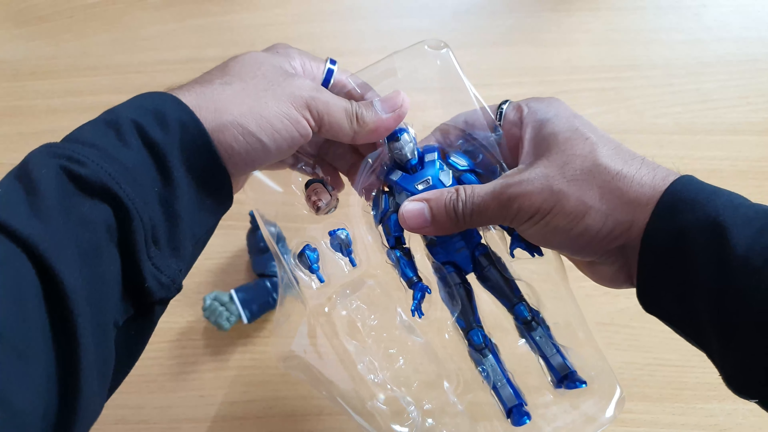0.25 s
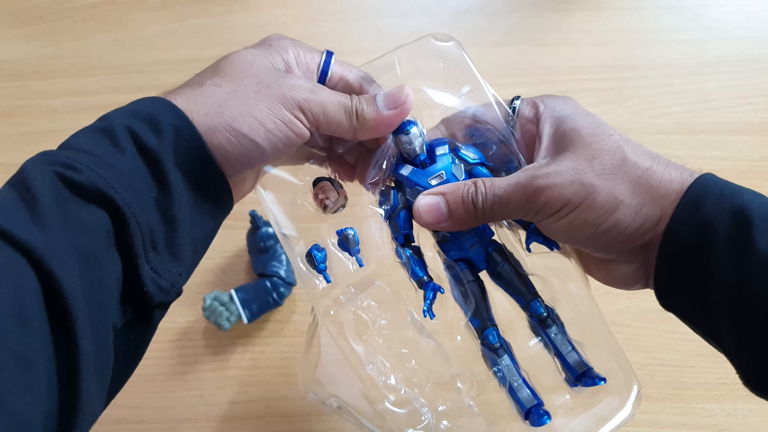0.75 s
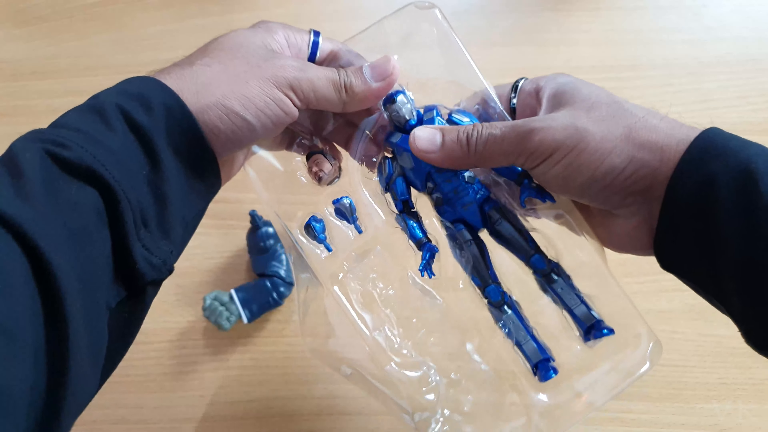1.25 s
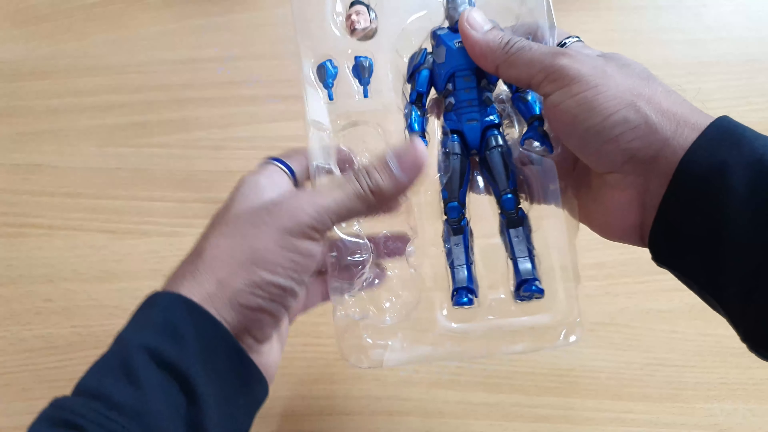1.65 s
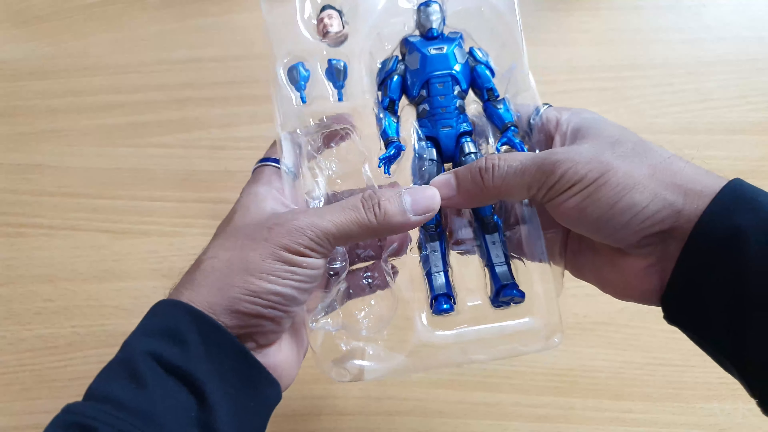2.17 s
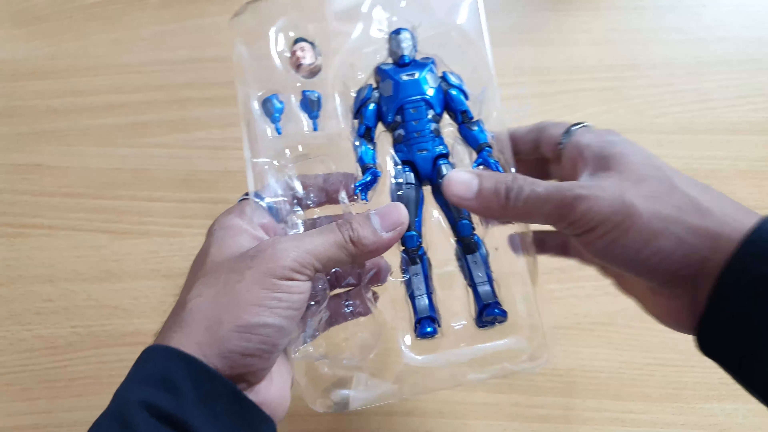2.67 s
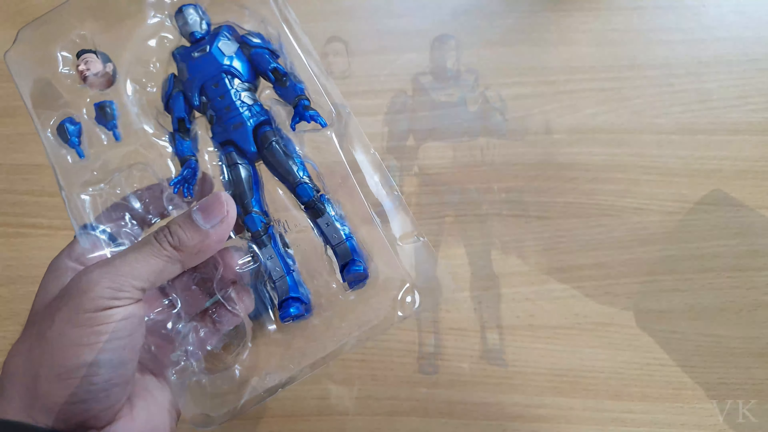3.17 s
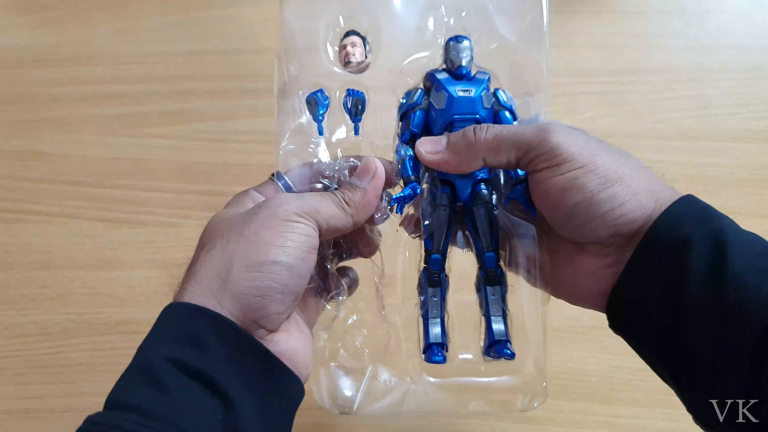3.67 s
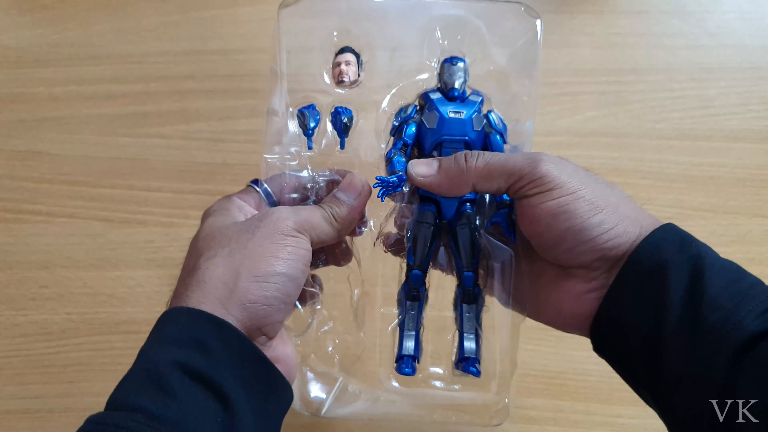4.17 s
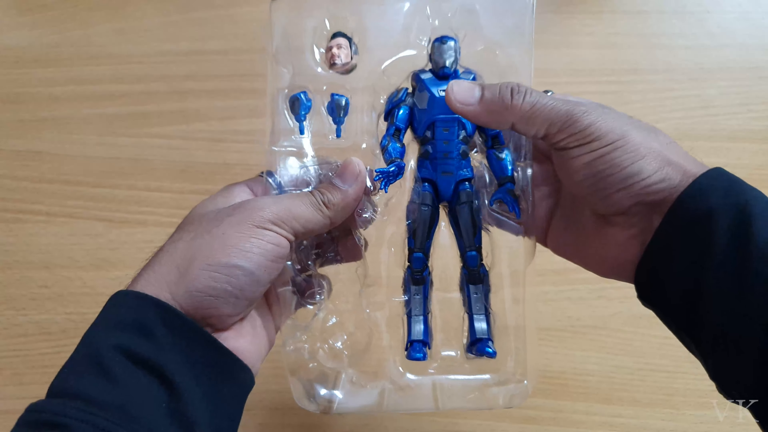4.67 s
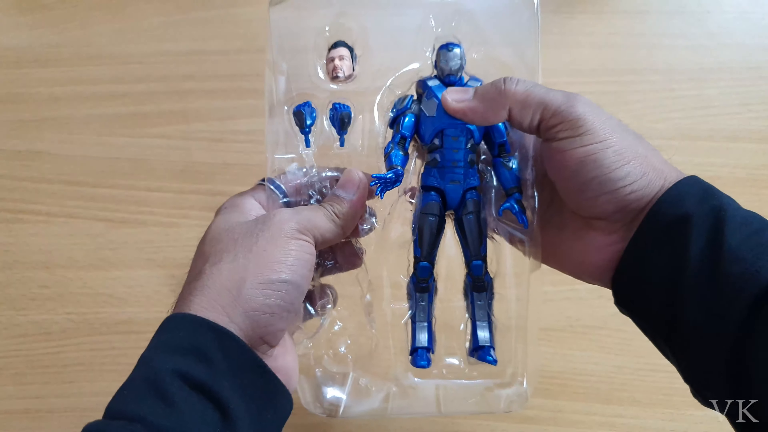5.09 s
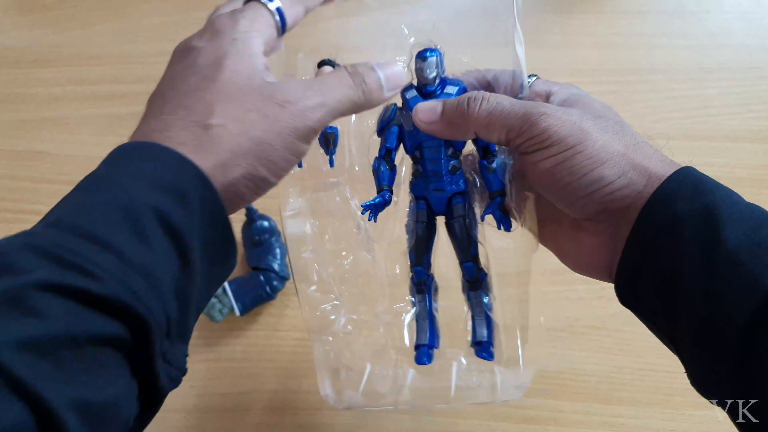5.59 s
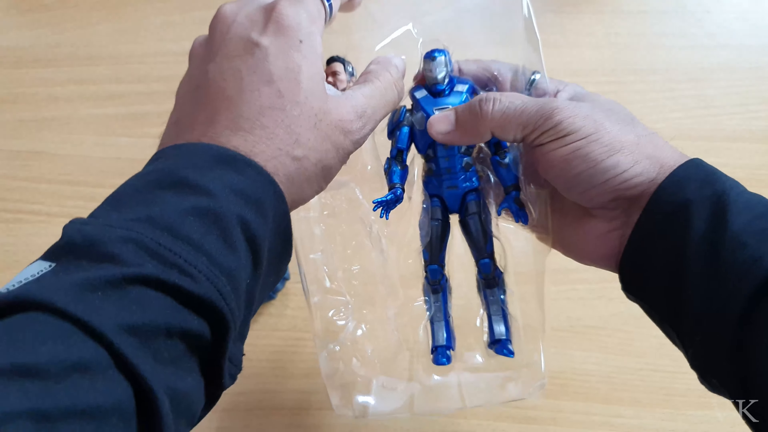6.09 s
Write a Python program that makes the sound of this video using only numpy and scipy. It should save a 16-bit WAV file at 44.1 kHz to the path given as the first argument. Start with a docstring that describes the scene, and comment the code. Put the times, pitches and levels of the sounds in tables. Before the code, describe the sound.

Thin rigid plastic crackles and crunches right up close as a toy is worked in its packaging. Irregular hollow knocks and bright sharp ticks come in bursts, softer and sparser at first, thickening around two seconds, nearly stopping, then returning loud and brittle with overloaded cracks and a grating creak. A short pause precedes the last busy snaps. Short room echoes and a steady dull room tone sit behind.

```python
"""Hands press and twist a stiff moulded plastic tray to free a toy, close to a stereo microphone in a small room.
A snap is already ringing at the start; dents then flip one after another under a crackling grip, with a brief
squeak as the toy slips. After a near lull the grip returns with denser, harder snaps, the loudest overloading,
and a second, slower creak; another pause, then a last flurry. Each dent has a main ring over bursts from walls,
ribs and creases; small creases crackle between; short diffuse echoes and steady dull room tone lie behind."""
import sys
import numpy as np
from scipy import signal
from scipy.fft import rfft, irfft, next_fast_len
from scipy.io import wavfile
from scipy.ndimage import uniform_filter1d

SR = 44100
rng = np.random.default_rng(int(sys.argv[2]) if len(sys.argv) > 2 else 0)


def to_wav(sig):
    """Store sig (one row per channel, or 1-D mono) as 16-bit WAV at the path in sys.argv[1].

    Samples outside -1..1 are clipped; the rate is SR.
    """
    pcm = np.clip(np.atleast_2d(sig), -1, 1) * 32767
    pcm = np.round(pcm).astype(np.int16)
    wavfile.write(sys.argv[1], SR, pcm.T)  # frames by channels


def how_loud(loudness_db):
    """Turn decibels into a plain amplitude multiplier (0 dB gives 1, 20 dB gives 10)."""
    steps = np.asarray(loudness_db, float) / 20
    return 10 ** steps


N = 279339
RUN_IN = 2048   # samples sounded before the start
LEAD_S = 0.00007   # the left hears the tray first

# where the tray's crowded modes bunch, in rows for panels, walls, ribs and creases:
# nominal centre_hz, nominal width_hz of one resonator pass
TRAY_MODES = [(520, 470), (1330, 694), (2650, 2130), (5600, 9700)]


def at_hz(points, hz, column=1):
    """Read a table on a log-frequency axis."""
    points = np.array(points)
    return np.interp(np.log(hz + 1), np.log(points[:, 0]), points[:, column])


def peak_one(x):
    """Scale each row to height 1."""
    return x / np.abs(x).max(axis=-1, keepdims=True)


def rms_one(x):
    """Scale to rms 1."""
    return x / np.sqrt(np.mean(x ** 2) + 1e-20)


def resonance(hz, centre_hz, width_hz):
    """Response of a damped resonator applied three times."""
    damping = 1j * hz * width_hz
    return (damping / (centre_hz ** 2 - hz ** 2 + damping)) ** 3


def swell(t, rise_s, t60):
    """The dent takes a moment to flip, then the sound dies."""
    rise = np.sin(np.pi / 2 * np.minimum(t / rise_s, 1)) ** 2
    return rise * how_loud(-60 * t / t60)


def dents():
    """Snaps and ticks as one list; a tick's main ring is faint and sits at the walls' pitch."""
    # dents snapping through: start_s, ribs_db, pitch_hz of the snap's main ring, main_db as its level, crack_db
    snap_list = [(-0.012, 8.5, 1850, -14.5, 5), (0.058, -3, 577, -15.5, -47),
                 (0.0685, -1.5, 928, -2.5, -29), (0.0793, 0, 351, -14.5, -42),
                 (0.2582, -49, 593, -12.5, -43), (0.332, -3, 858, -9.5, -35.5),
                 (0.382, 2, 2710, -18.5, -35.5), (0.4488, 4.5, 721, -4, 3.5), (0.4753, 8.5, 657, 3.5, 3),
                 (0.6751, 2, 2890, -13.5, -6.5), (0.7357, -6.5, 775, -9.5, -65),
                 (0.775, -17, 361, -10.5, -59), (0.8141, 1, 2640, 2, -3), (0.9058, -21.5, 668, -7.5, -59),
                 (0.9663, -48, 336, -22, -11), (1.0703, -9, 2506, -17.5, -46),
                 (1.145, -12.5, 1400, -15, -49), (1.161, -2.5, 1910, -8, -44),
                 (1.169, -18.5, 650, -6, -39.5), (1.317, -38.5, 446, -22, -54),
                 (1.3271, -18, 560, -11.5, -48), (1.355, 8.5, 560, -2.5, 7),
                 (1.4598, -16.5, 624, -14.5, -56), (1.596, -24, 585, -22, -69.5),
                 (1.639, -25, 512, -6, -41), (1.671, -14.5, 509, -11, -54), (1.7966, -7.5, 559, -12, -27.5),
                 (1.8142, -0.5, 612, -9.5, -37), (1.8584, 1, 1460, -6, -23.5),
                 (1.8776, 4, 1415, -4.5, -32.5), (1.9473, -5, 1394, -11.5, -49.5),
                 (1.9655, -19.5, 1340, -8.5, -46), (2.0024, 0, 1410, -7.5, -9.5),
                 (2.0375, -6, 742, -10.5, -40.5), (2.0768, -3.5, 562, -8, -49.5),
                 (2.1088, 6.5, 2280, -2, -44.5), (2.1444, 4, 611, -17.5, -10.5), (2.155, -2, 1480, -4, -24),
                 (2.2014, -7.5, 2830, -2, -1), (2.3211, -7, 1248, -11, -43), (2.4079, -4, 1064, -21, -30.5),
                 (2.5266, -6, 1640, -17.5, -32.5), (2.6191, 6, 559, -8.5, 0),
                 (3.3825, -37.5, 2900, -9, -11), (3.4808, -11, 689, 0.5, -1),
                 (3.5063, 12, 3130, -14.5, -2.5), (3.5178, -18.5, 567, -14, 4.5),
                 (3.5581, -8, 670, -3, -35.5), (3.597, 11, 757, 4.5, -0.5), (3.745, 2.5, 751, -16, -10),
                 (3.757, -2, 3200, -10.5, 1), (3.8462, -4, 1696, -19.5, -6),
                 (3.9258, 2.5, 1420, -14, -43.5), (3.9673, 5.5, 684, -6.5, 7.5),
                 (3.9949, -1, 3030, 7.5, -12.5), (4.012, 9, 670, -10, 18.5), (4.0322, 9, 2730, 6, 13.5),
                 (4.0634, 9, 690, -0.5, -33), (4.1377, -4, 2086, -7, -18), (4.237, -5.5, 2670, -8.5, -4),
                 (4.2666, 1.5, 746, -12, -5), (4.285, 7, 1310, -9, -12), (4.298, 0.5, 774, -21, -1.5),
                 (4.3562, 9, 620, -2, 6), (4.5862, 2.5, 1933, -9, -4), (4.623, -5.5, 2390, -6.5, -6),
                 (4.7003, -0.5, 1390, -4, -16.5), (4.9291, 13.5, 704, 3, 4), (4.984, 2, 452, -14, -42),
                 (5.0377, -4, 780, -15, -1.5), (5.121, -7, 2320, -2.5, -53), (5.1283, 5.5, 1400, 2, -33.5),
                 (5.19, -2.5, 2830, -3.5, -2.5), (5.222, 10, 803, -3, 0.5), (5.2405, -6.5, 577, 0.5, 2),
                 (5.36, -4, 700, -16.5, -41.5), (5.368, -11.5, 290, -17.5, -53),
                 (5.385, -9.5, 626, -17.5, -47), (5.6336, -9.5, 558, -31.5, -64),
                 (5.6514, -20, 586, -24, -50), (5.8205, -24.5, 1490, -16.5, -42),
                 (5.8614, 13, 1555, -6, -33), (5.8777, 3, 737, -7, -45.5), (5.9237, -16, 546, -12.5, -27.5),
                 (5.9501, 11.5, 1207, -10.5, -31.5), (5.9836, -15.5, 776, -15.5, -40),
                 (6.005, 6.5, 805, -1.5, -35), (6.082, 2, 463, -4.5, -41), (6.1126, 1.5, 2865, -3.5, -49.5),
                 (6.1317, -19.5, 2570, -7, -50), (6.144, -20.5, 2750, -6.5, -33.5),
                 (6.1639, 3, 750, -13.5, -35.5), (6.2043, -22.5, 2520, -2.5, -20.5),
                 (6.2105, -2, 790, -13.5, -43.5), (6.2645, 1.5, 3080, -12.5, -4.5),
                 (6.269, -30, 347, -23, -60.5), (6.294, -8.5, 834, -15, -34), (6.3145, -4, 733, -15.5, -48)]
    # single creases ticking: start_s, ribs_db, crack_db
    tick_list = [(0.137, -4, -32), (0.1629, -11.5, -6.5), (0.2104, 3.5, 2), (0.23, 4.5, -21),
                 (0.3206, 1, 12.5), (0.5966, 9.5, -21.5), (1.787, -10, -31.5), (2.5363, -10, -9.5),
                 (2.924, -34.5, -38), (3.3714, -5.5, -8.5), (3.4639, 4, -3.5), (3.787, -12.5, -16),
                 (3.7929, -1.5, 5.5), (3.88, -3, -9), (3.9772, 5.5, -33), (4.1691, -2, -0.5),
                 (4.215, -5.5, -14), (4.291, -8, -29), (4.316, -4.5, -8.5), (4.5036, 0, -9),
                 (4.834, -19, -7.5), (5.1723, 3, -41.5), (5.256, 7, -23.5), (5.599, -18, -41.5)]
    tick_main_db = -27.5   # against the tick's ribs
    return snap_list + [(s, ribs_db, TRAY_MODES[1][0], ribs_db + tick_main_db, crack_db)
                        for s, ribs_db, crack_db in tick_list]


def snaps():
    """Each flip shakes the tray for a few ms; returns what the two microphones hear and what goes into the room."""
    start_s, ribs_db, pitch_hz, main_db, crack_db = np.transpose(dents())
    # the walls' level lies between the main ring's and the ribs'; high rings count for less
    main_share, wall_gain_db = 0.48, -2.5
    octaves_high = np.maximum(np.log2(pitch_hz / 1400), 0)
    walls_db = main_share * (main_db - 9 * octaves_high) + (1 - main_share) * ribs_db + wall_gain_db
    pitch, main_level, ribs_level = pitch_hz[:, None], main_db[:, None], ribs_db[:, None]
    count = len(start_s)
    t = np.arange(4096) / SR
    hz = np.arange(len(t) // 2 + 1) * SR / len(t)
    chance = rng.standard_normal((count, 8, 1))

    # the main ring beats with a weaker, usually lower neighbour
    turns = pitch * t
    neighbour_turns = turns * (0.8 + 0.07 * chance[:, 0]) + chance[:, 1]
    tone = np.sin(2 * np.pi * turns) + 0.31 * np.sin(2 * np.pi * neighbour_turns)
    slow = (600 / pitch) ** 0.61   # high rings rise and die faster
    # a dent that spares the ribs rolls over gently
    soft = np.clip(how_loud(0.4 * (main_level - ribs_level)), 0.7, 3.0)
    ring = how_loud(main_level) * peak_one(tone * swell(t, rise_s=0.0023 * slow * soft, t60=0.046 * slow))

    # the whole tray booms most under main rings near 1 kHz, 30 dB less per octave away
    body_hz = 455.4 * (1 + 0.12 * np.tanh(chance[:, 6]))
    body = np.sin(2 * np.pi * body_hz * t) * peak_one(swell(t, rise_s=0.0054, t60=0.022))
    ring = ring + body * how_loud(main_level - 30 * np.abs(np.log2(pitch / 1000)))

    # the ring's front and back partly cancel at a distance: the room gets mostly its first, broad push
    left, right, radiated = ring, ring, ring * how_loud(1.5 - 60 * t / 0.037)

    # walls, ribs and creases: nominal flip time (s), left-right unlikeness, spread of tuning
    parts = [(0.0045, 0.31, 0.074), (0.0045, 0.2, 0.21), (0.0048, 1, 0.047)]
    for k, part_db in enumerate([walls_db, ribs_db, crack_db], start=1):
        flip_s, unlike, spread = parts[k - 1]
        centre_hz, width_hz = TRAY_MODES[k]
        shape = resonance(hz, centre_hz * (1 + spread * chance[:, k + 1]), width_hz)
        push = np.sin(np.pi * np.minimum(t / (flip_s * soft[:, None]), 1)) ** 2
        jolts = rng.standard_normal((count, 2, len(t))) * push
        pair = irfft(rfft(jolts[:, :1] + unlike * jolts) * shape[:, None], len(t))
        pair = how_loud(part_db[:, None, None]) * peak_one(pair)
        left, right = left + pair[:, 0], right + pair[:, 1]
        # summed over all directions the burst has a smooth spectrum and the same energy
        smooth = irfft(shape, len(t))
        strength = np.linalg.norm(pair[:, 0], axis=1) / np.linalg.norm(smooth, axis=1)
        radiated = radiated + smooth * strength[:, None]

    # each snap comes from its own spot on the tray, so its lead on the left differs
    lead_s = LEAD_S + 0.00005 * chance[:, 5]
    right = irfft(rfft(right) * np.exp(-2j * np.pi * hz * lead_s), len(t))
    out = np.zeros((3, RUN_IN + N + len(t)))
    starts = RUN_IN + np.round(start_s * SR).astype(int)
    for start, heard in zip(starts, np.stack([left, right, radiated], axis=1)):
        out[:, start:start + len(t)] += heard
    return out[:2, RUN_IN:RUN_IN + N], out[2, :RUN_IN + N]


def pressure_db():
    """Each grip closes fast, surges, settles to its hold and lets go; strain gathers round each snap; the firmest rules."""
    # the fingers grip the creases: start_s, length_s, hold_db of the crackle, surge_db above it at first contact
    grip_list = [(-.05, 1.2, -33, 17.5), (1.776, 0.44, -33, 10), (3.403, 0.9, -30.5, 2),
                 (4.301, 0.486, -41, 33), (4.887, 0.53, -31, 11), (5.799, .6, -37, 3.5)]
    t = np.arange(0, N / SR, 0.001)
    # creases strain just before a dent gives and settle after it (dB per s)
    strain = np.max([ribs_db - 21 - 2500 * np.maximum(s - t, 0) - 303 * np.maximum(t - s, 0)
                     for s, ribs_db, *_ in dents()], axis=0)
    grips = []
    for s, length_s, hold_db, surge_db in grip_list:
        surge = surge_db * np.exp(-np.maximum(t - s, 0) / 0.06)
        closing = 1500 * np.maximum(s - t, 0)   # dB per s
        release = 400 * np.maximum(t - s - length_s, 0)   # dB per s
        grips.append(hold_db + surge - closing - release)
    return np.interp(np.arange(N) / SR, t, np.maximum(np.max(grips, axis=0), strain))


def crackle(per_s, uneven_db, clump_db):
    """Small creases give way in clumps; each shakes the four parts of the tray by its own amounts."""
    clumps = how_loud(clump_db * rms_one(uniform_filter1d(rng.standard_normal(N), size=400)))
    born = rng.random(N) < per_s * clumps / clumps.mean() / SR
    sizes = how_loud(uneven_db * np.minimum(rng.exponential(1, N), 4)) * born
    # steady pressure frees steady energy
    sizes = sizes / np.sqrt(uniform_filter1d(sizes ** 2, size=6000) + 0.026)
    size = next_fast_len(N)
    hz = np.arange(size // 2 + 1) * SR / size
    spectrum = 0
    for (centre_hz, width_hz), part_db in zip(TRAY_MODES, [6.5, 5.0, 3.0, -3.0]):
        for bend in (0.88, 1, 1.22):   # each crease favours a patch that is tuned lower or higher
            share = rng.standard_normal(N) ** 2 * rng.choice([-1, 1], N)
            shape = resonance(hz, bend * centre_hz, 0.76 * width_hz)
            spectrum = spectrum + how_loud(part_db) * rfft(sizes * share, size) * shape
    left = rms_one(irfft(spectrum, size)[:N]) * how_loud(pressure_db())
    right = np.interp(np.arange(N) - LEAD_S * SR, np.arange(N), left)
    return np.array([left, right])


def creak():
    """Stick-slip: nearly even ticks swell and fade, ringing the walls and ribs; fast slips squeak."""
    # the toy slips against a wall: start_s, length_s, first_slips_per_s, last_slips_per_s,
    # peak_db, ribs_db against the walls
    slip_list = [(1.191, 0.14, 1500, 1840, -32.5, -43), (4.848, 0.1, 143.7, 119.7, -9, -5.5)]
    size = 8192
    hz = np.arange(size // 2 + 1) * SR / size
    out = np.zeros(N)
    for s, length_s, first_hz, last_hz, peak_db, ribs_db in slip_list:
        t = np.minimum(np.arange(size) / SR, length_s)
        stumble = 0.08 * np.cumsum(rng.standard_normal(size)) * np.sqrt(first_hz / SR)
        glide = first_hz * t + (last_hz - first_hz) * t ** 2 / (2 * length_s)
        slips = np.maximum.accumulate(np.floor(glide + stumble))
        uneven = how_loud(3 * rng.standard_normal(size))
        ticks = np.diff(slips, prepend=0) * uneven * np.sin(np.pi * t / length_s)
        shape = resonance(hz, *TRAY_MODES[1]) + how_loud(ribs_db) * resonance(hz, *TRAY_MODES[2])
        rung = irfft(rfft(ticks) * shape, size)
        start = round(s * SR)
        out[start:start + size] = how_loud(peak_db) * peak_one(rung)
    return out


def diffuse(size):
    """Spectra of a left and a right noise, alike in the bass only."""
    # diffuse sound at the two microphones: frequency_hz, left-right likeness (0 to 1)
    likeness = [(300, 0.91), (700, 0.66), (1500, 0.066)]
    hz = np.arange(size // 2 + 1) * SR / size
    mid, side = rfft(rng.standard_normal((2, size)))
    alike = np.clip(at_hz(likeness, hz), 0, 1)
    pair = np.sqrt(1 + alike) * mid + np.sqrt(1 - alike) * side * [[1], [-1]]
    return hz, pair / np.sqrt(2)


def room(x, gap_s):
    """Diffuse echoes dying band by band, fading in over a short gap."""
    # how the small room answers: frequency_hz, t60_s, level_db
    decay = [(294, 0.23, -0.5), (1400, 0.15, 1.5), (5160, 0.32, -8), (13000, 0.1, -10.5)]
    t = np.arange(16384) / SR
    hz, noise = diffuse(len(t))
    tail = 0
    for centre_hz in 125 * 2 ** np.arange(8):
        band = np.clip(1 - np.abs(np.log2((hz + 1) / centre_hz)), 0, 1)
        t60 = at_hz(decay, centre_hz)
        fade = how_loud(at_hz(decay, centre_hz, column=2) - 60 * t / t60)
        fade = fade / np.sqrt(t60 * SR / np.log(1e6))   # evens out the energy of long and short decays
        tail = tail + irfft(noise * band, len(t)) * fade
    tail = tail * np.clip(t / gap_s, 0, 1) ** 2
    return signal.fftconvolve(x[None], tail, axes=1)[:, RUN_IN:RUN_IN + N]


def air():
    """Steady dull room tone: noise shaped by a falling spectrum."""
    # spectrum of the room tone: frequency_hz, relative density_db (per Hz)
    tone_curve = [(30, -50), (80, -15), (260, -11.5), (1000, -22.5), (1700, -25.5), (5000, -42.5),
                  (14000, -101.5)]
    size = next_fast_len(N)
    hz, noise = diffuse(size)
    shaped = irfft(noise * how_loud(at_hz(tone_curve, hz)), size)[:, :N]
    return how_loud(-49.5) * rms_one(shaped)


def scene():
    """The tray, its echoes and the room tone."""
    direct, radiated = snaps()
    small = crackle(per_s=480.0, uneven_db=5.0, clump_db=6.0) + creak()
    tray = (direct + small) * how_loud([[-1], [1]])   # the left is 2 dB softer than the right
    to_room = radiated + np.pad(small[0], (RUN_IN, 0))
    return tray + room(to_room, gap_s=0.0084) + air()


def low_pass(x):
    """Removes everything above the highest recorded frequency."""
    return signal.sosfilt(signal.butter(12, 16380, fs=SR, output="sos"), x)


def record(dry):
    """The input overloads at full scale."""
    overloaded = np.clip(dry, -1, 1)
    return low_pass(overloaded)


dry = scene()
out = record(dry)
to_wav(out)
```